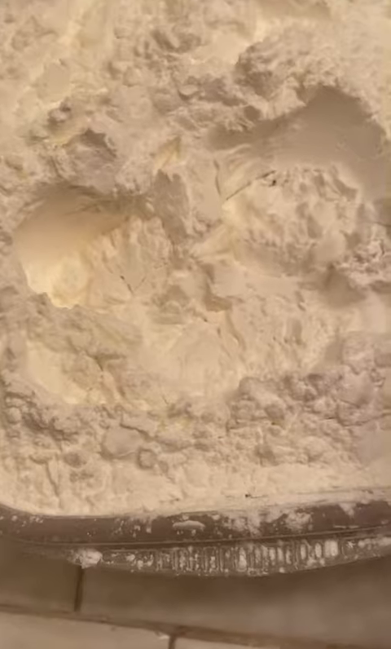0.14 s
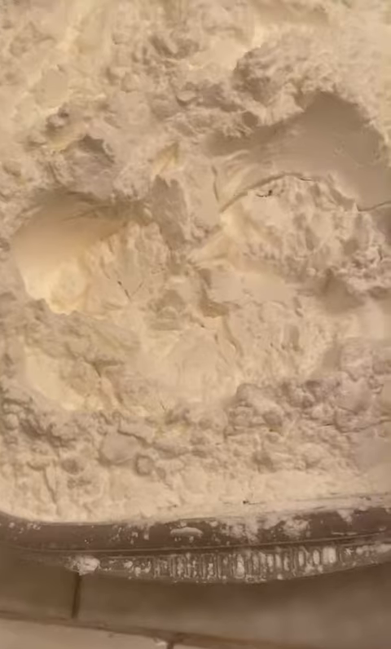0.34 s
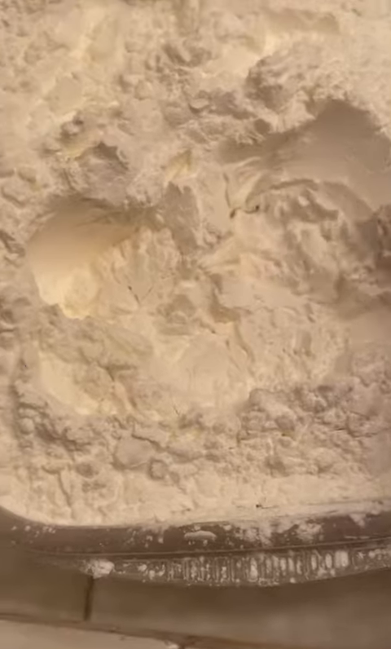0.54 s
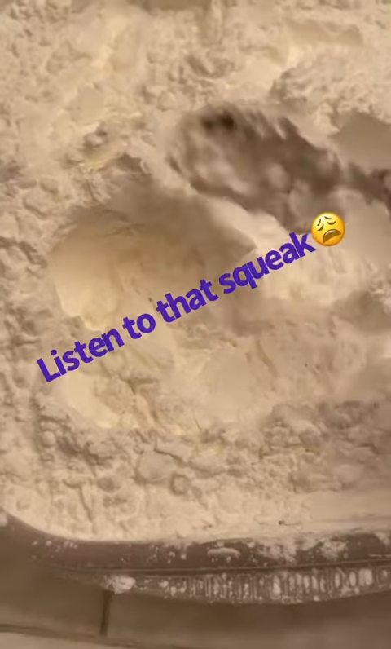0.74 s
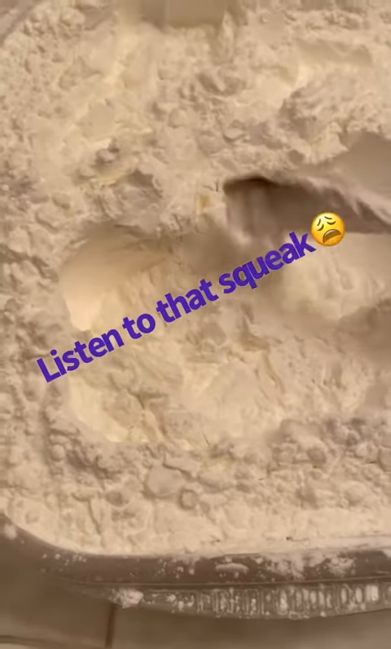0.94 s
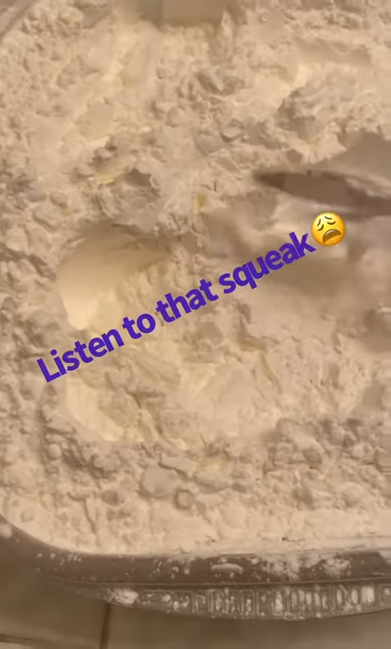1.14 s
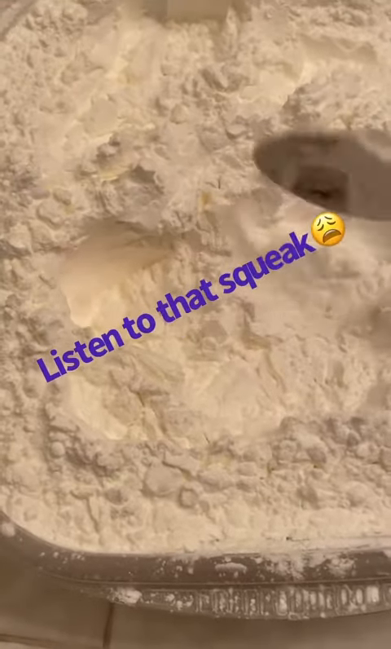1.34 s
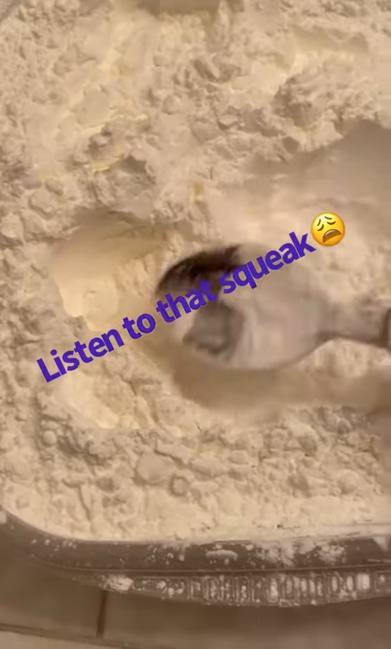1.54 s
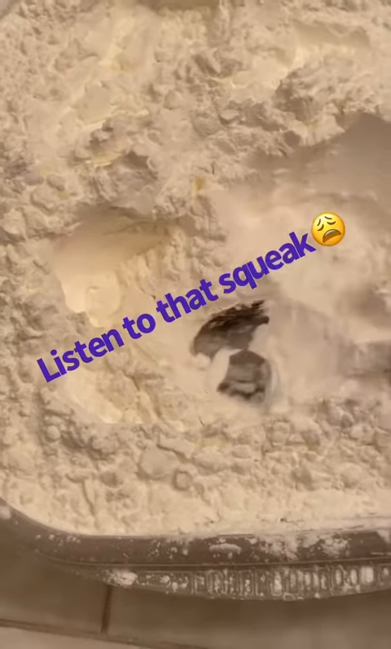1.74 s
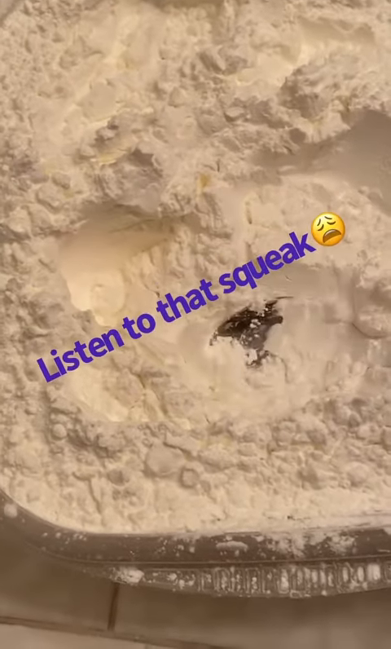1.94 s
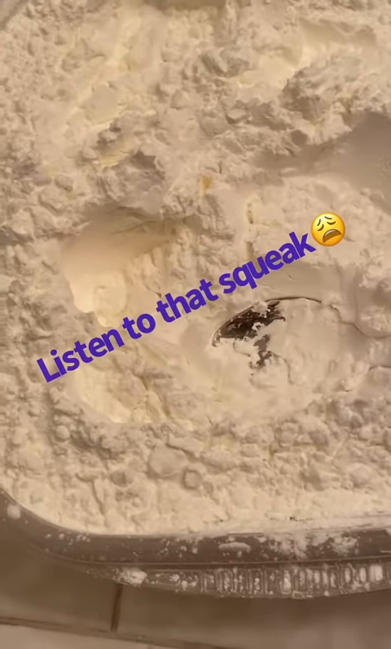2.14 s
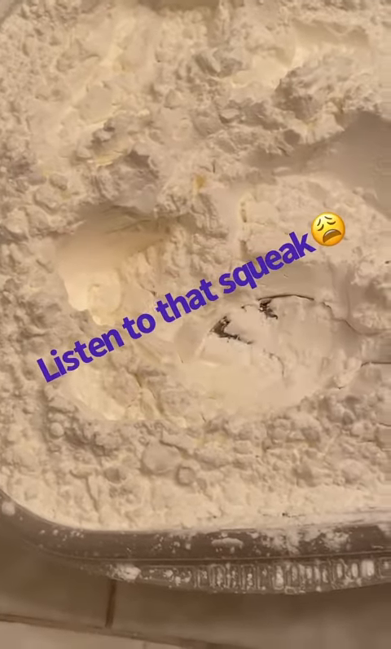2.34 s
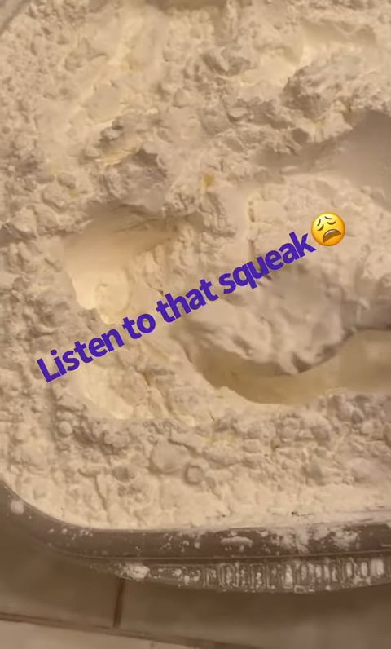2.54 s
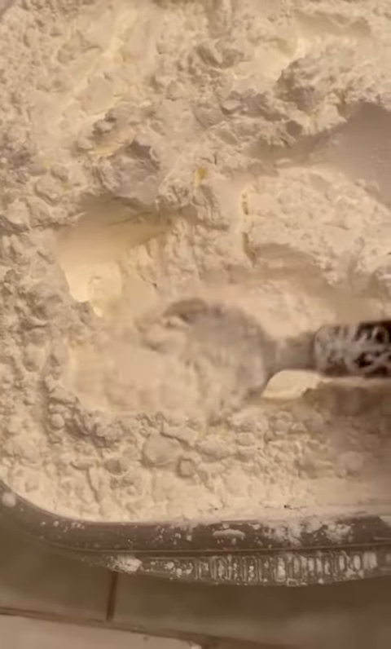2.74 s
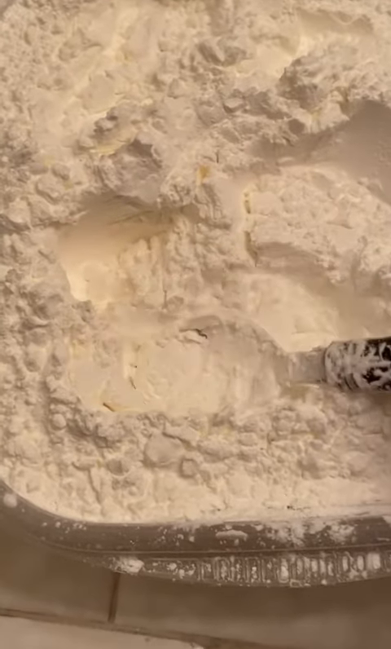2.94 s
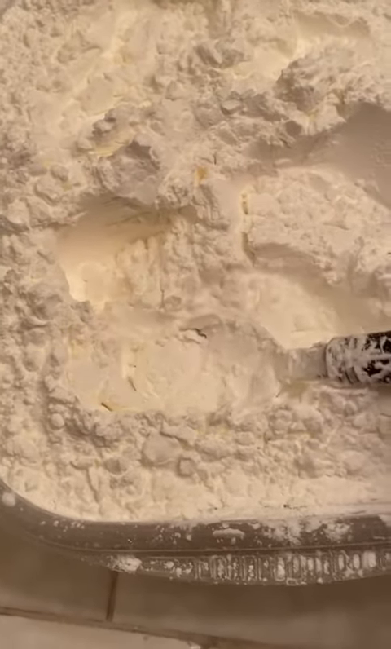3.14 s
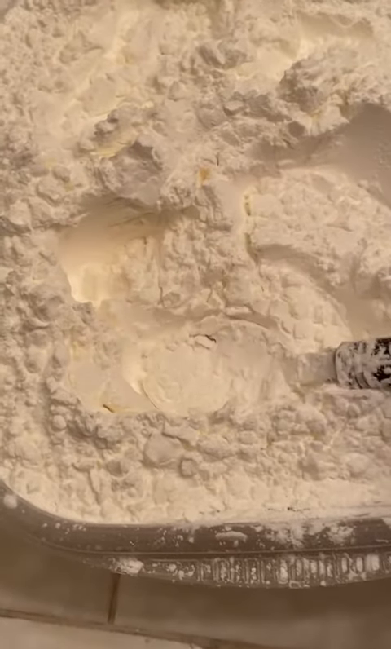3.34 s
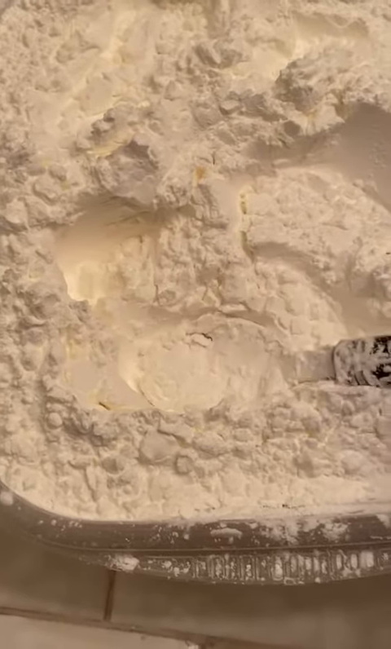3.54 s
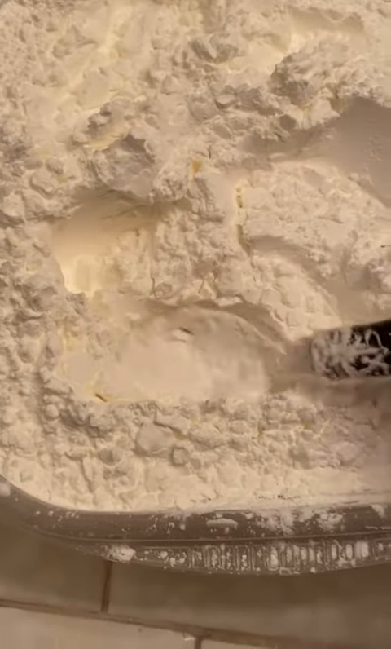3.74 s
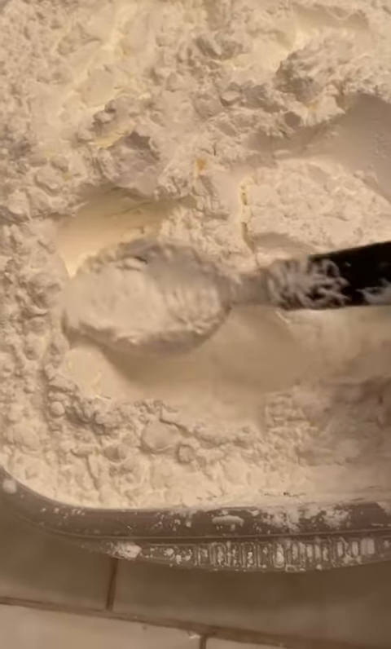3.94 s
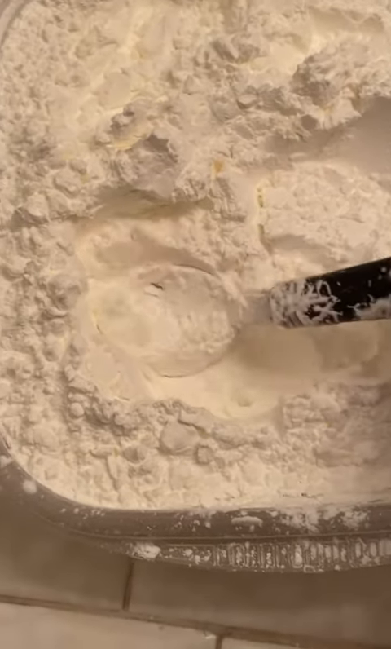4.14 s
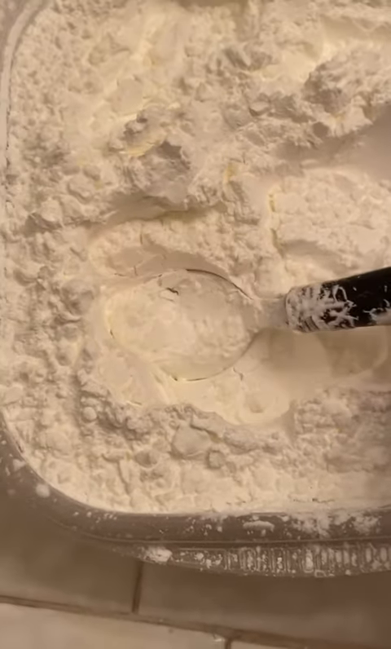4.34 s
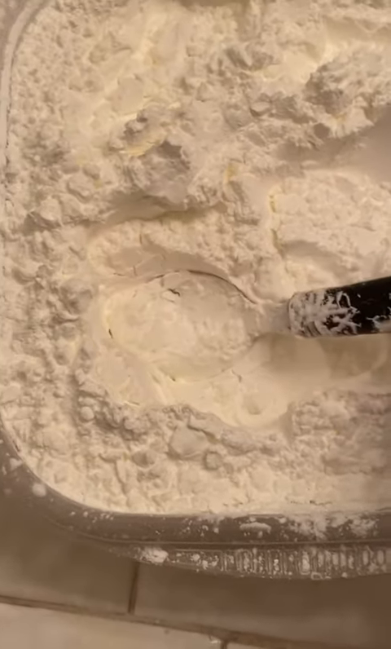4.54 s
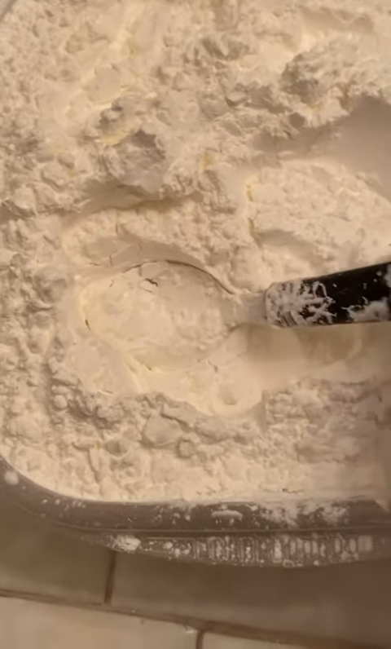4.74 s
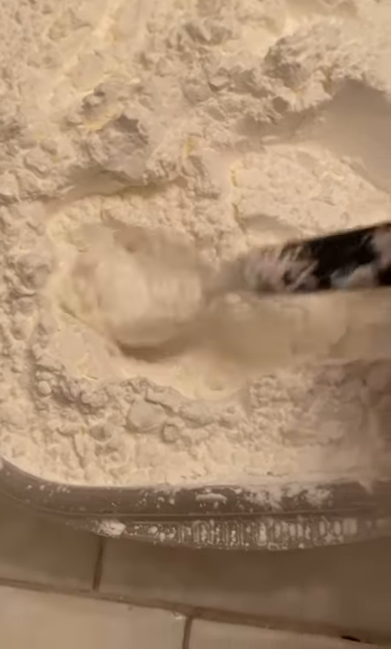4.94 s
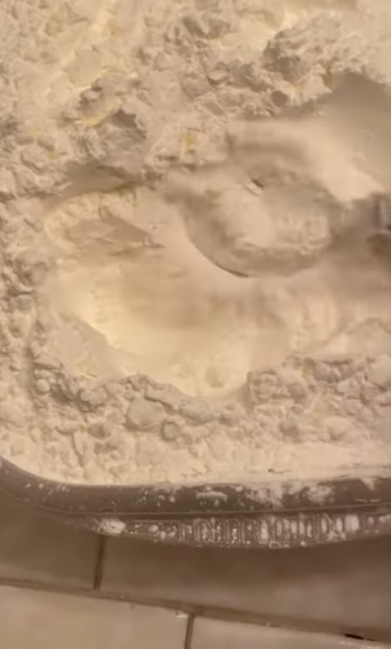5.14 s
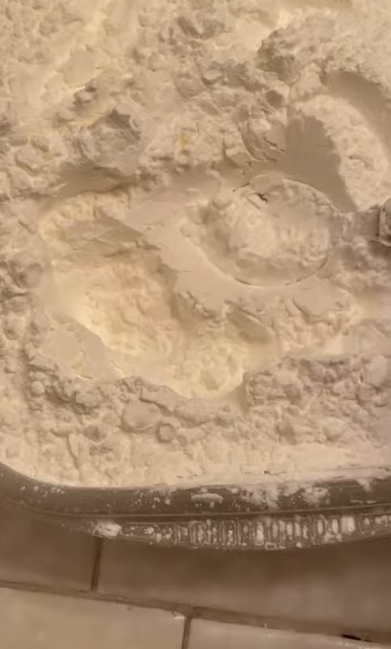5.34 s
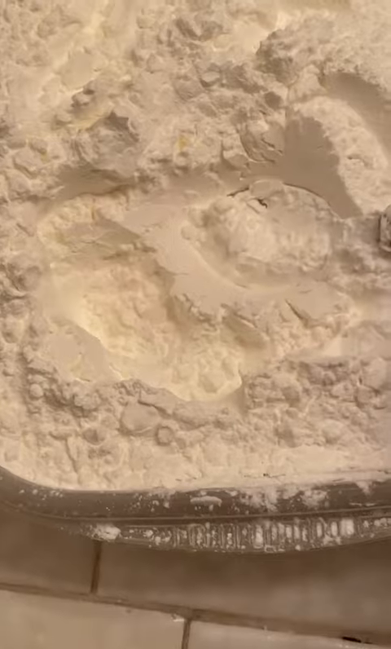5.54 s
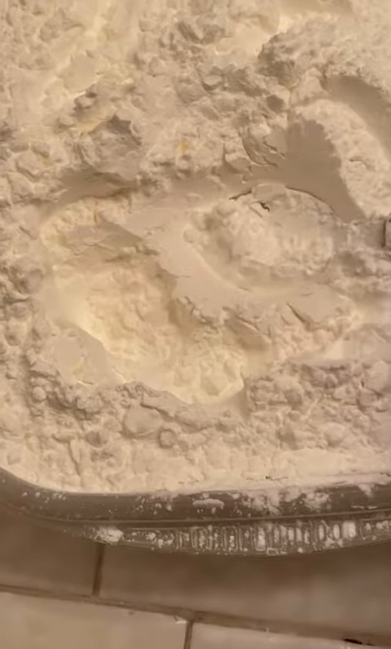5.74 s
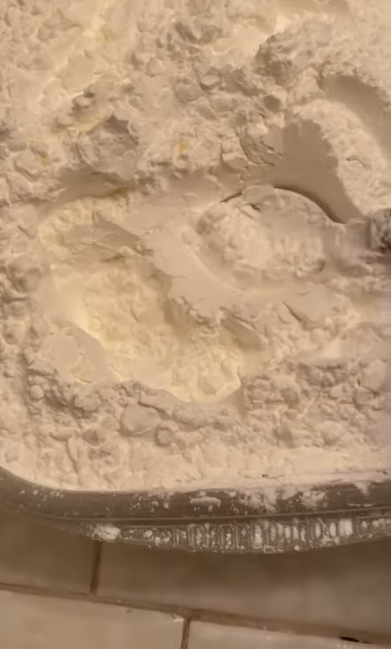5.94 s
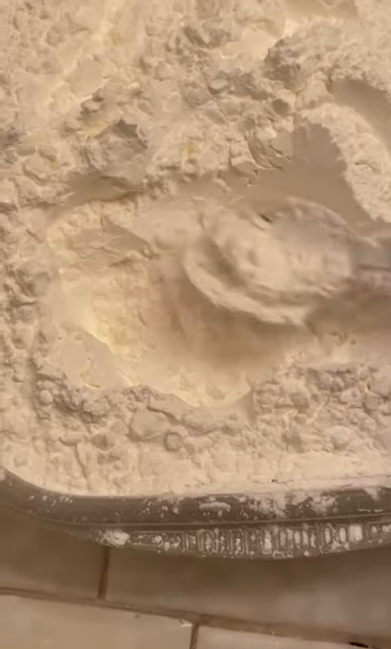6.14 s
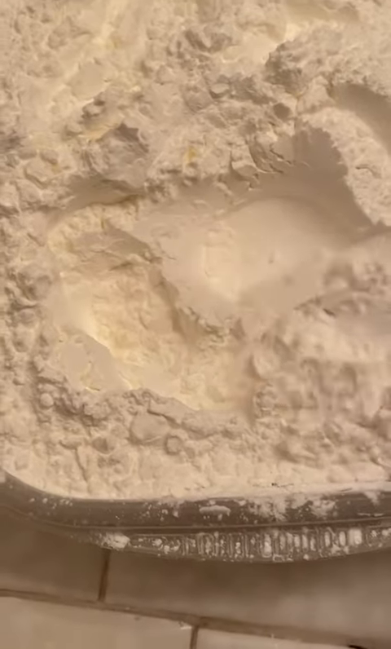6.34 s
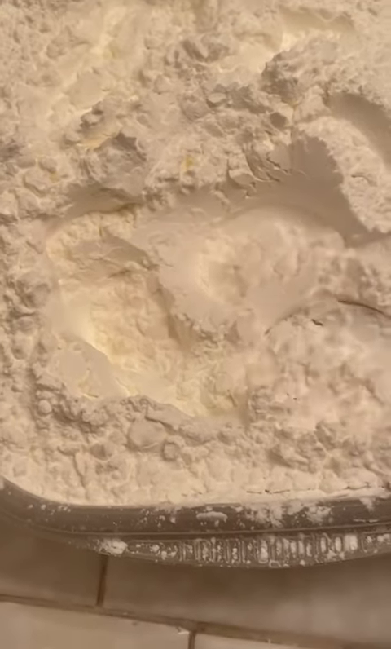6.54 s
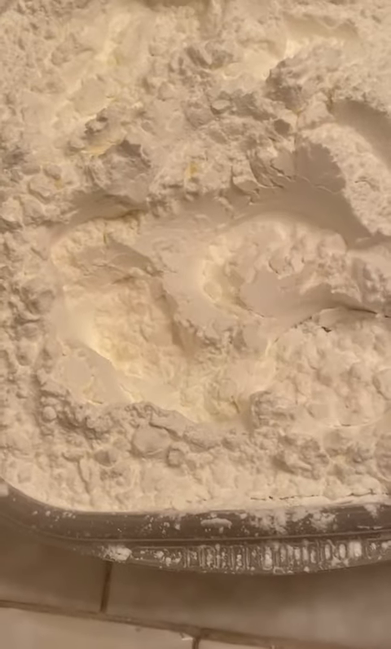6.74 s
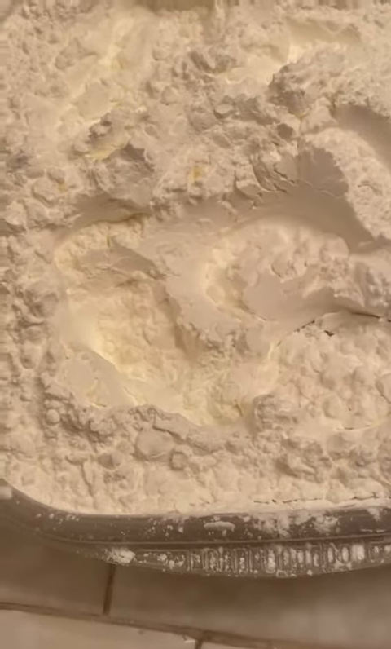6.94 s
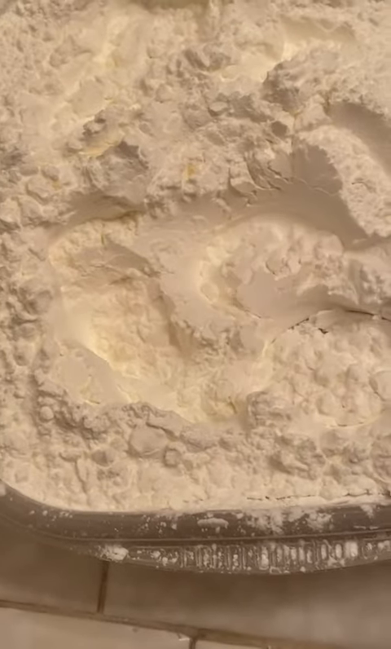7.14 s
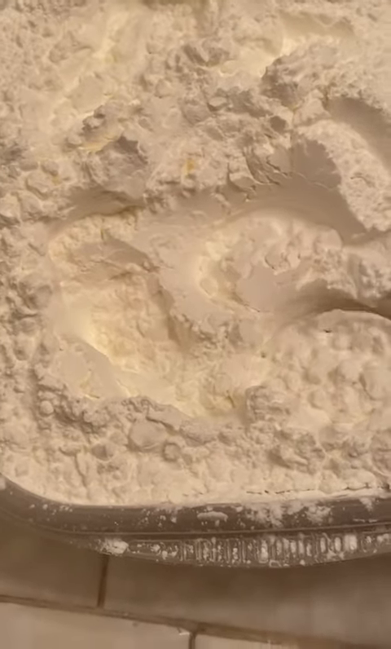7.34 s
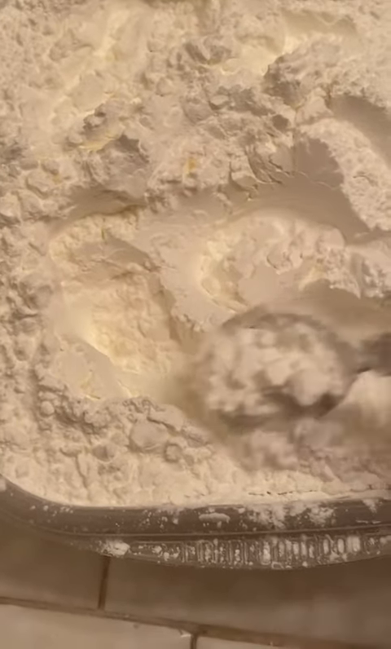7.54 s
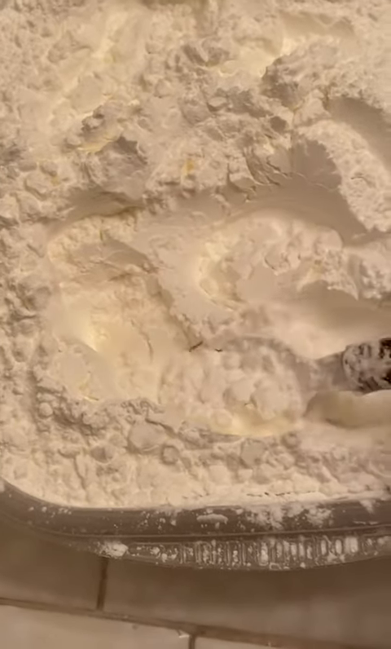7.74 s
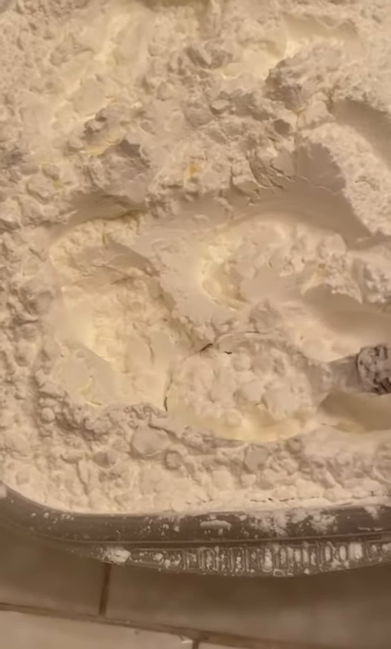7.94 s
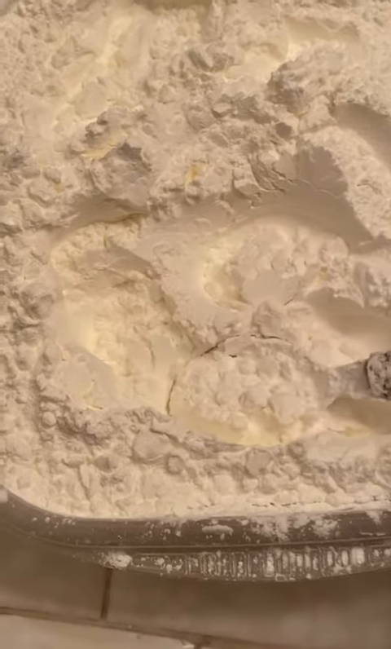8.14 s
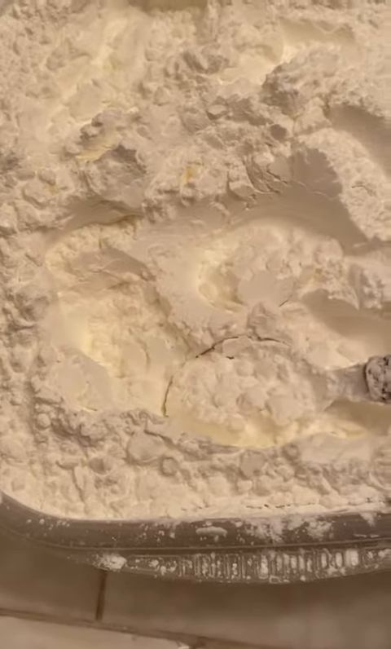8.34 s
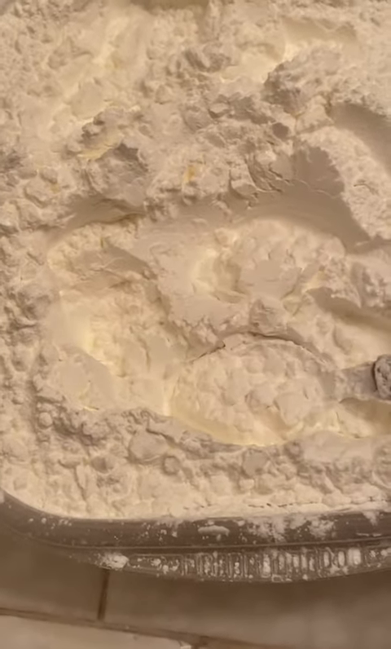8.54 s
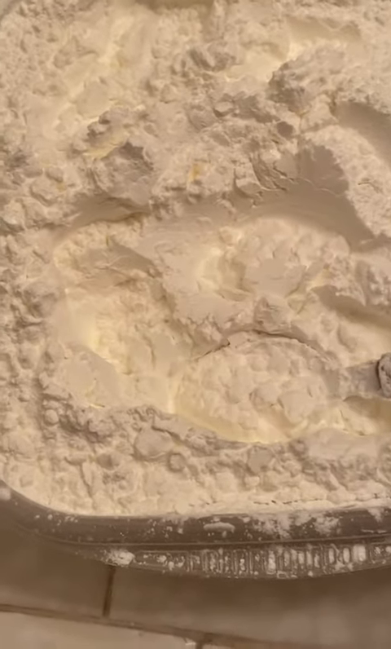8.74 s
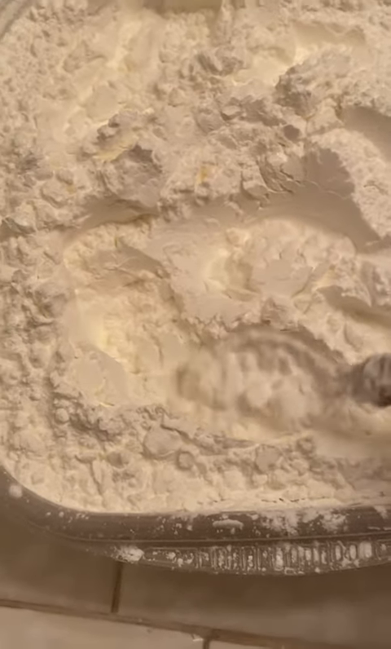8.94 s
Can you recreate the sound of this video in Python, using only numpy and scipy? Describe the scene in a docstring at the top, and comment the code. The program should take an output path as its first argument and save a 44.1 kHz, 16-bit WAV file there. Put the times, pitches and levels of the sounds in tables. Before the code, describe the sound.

Dry, tightly packed powder creaks and crunches under repeated spoon pushes, chirping in places, over a faint indoor rumble and hiss.

```python
"""A quiet kitchen rumbles and hisses; a faint steady tone, a sine and its octave, fades after about five seconds.
From the start a metal spoon is pushed again and again into a plastic tub of packed cornstarch, which yields
by stick and slip: even slips fuse into gliding squeaks, lone ones chirp and crack, crowds crunch over a rub of grains.
Now and then loose powder trickles as high hiss; early on, two knocks ring spoon and tub, crush powder and thump.
Later pushes also flex the tub wall, heard as swells of dull noise; the kitchen answers with reflections and a tail."""
import sys
import numpy as np
from scipy import signal
from scipy.fft import rfft, irfft, next_fast_len
from scipy.io import wavfile
from scipy.ndimage import uniform_filter1d

SR = 44100
rng = np.random.default_rng(int(sys.argv[2]) if len(sys.argv) > 2 else 0)


def master_out(mix):
    """Clip the mix to full scale and print it as 16-bit PCM to the path in sys.argv[1]."""
    frames = np.transpose(np.atleast_2d(mix))
    ceiling = np.clip(frames, -1, 1)
    pcm = np.round(ceiling * 32767).astype(np.int16)
    wavfile.write(sys.argv[1], SR, pcm)


N = 400428
TIME = np.arange(N) / SR   # [s]

# lone slips that stand out of the crunching:
# (time of letting go [s], chirp level [dB], crack level [dB], pitch [Hz])
SLIPS = [(0.0398, -35.5, -61, 1280), (0.0508, -31.5, -54.5, 870), (0.0728, -30, -47, 900),
         (0.135, -28.5, -49, 1160), (0.165, -28.5, -46, 1350), (0.2262, -37.5, -67, 1030),
         (0.248, -29, -50.5, 800), (0.266, -36, -47, 1830), (0.2988, -23, -45.5, 1090),
         (0.32, -36, -53, 1290), (0.3319, -27, -43.5, 1840.0), (0.378, -26.5, -42, 1330),
         (0.3938, -32, -46, 900), (0.3983, -27, -43, 1450), (0.4046, -23, -39.5, 1210),
         (1.9584, -41.5, -82, 646), (1.9901, -43, -76, 594), (2.041, -40.5, -66, 540.0),
         (2.1065, -37.5, -54.5, 664), (2.2696, -30.5, -53, 900), (2.2784, -39, -53, 617),
         (2.2946, -31.5, -57, 820), (2.3019, -34, -50.5, 1090), (2.3117, -24.5, -44.5, 1100.0),
         (3.145, -37.5, -57.5, 524), (3.2498, -36.5, -64, 1010), (3.2658, -35.5, -59, 940),
         (3.2959, -36.5, -55, 714), (3.318, -31.5, -52, 820), (3.329, -31, -58, 880),
         (3.3367, -32.5, -55, 785), (3.3433, -30, -47, 1000.0), (3.363, -30, -57, 1060),
         (3.3779, -29.5, -52, 910), (3.3825, -33.5, -52, 850), (3.3986, -31.5, -48, 740),
         (3.4043, -34.5, -49.5, 870), (3.4208, -25.5, -46.5, 1110.0), (3.4485, -41, -56, 715),
         (3.4798, -31.5, -54.5, 876), (3.5159, -33.5, -58, 1000), (3.535, -40, -65, 850),
         (3.546, -26, -45, 1060.0), (3.563, -27.5, -44, 1000.0), (3.571, -33, -51, 1270),
         (3.5783, -27.5, -46.5, 870), (3.5855, -31.5, -59, 880), (3.5997, -33.5, -51, 1170),
         (4.219, -37.5, -57.5, 570.0), (4.2654, -32.5, -49.5, 710), (4.3514, -39, -59.5, 780),
         (4.3687, -41, -58, 910), (4.4142, -33.5, -51.5, 750), (4.4387, -34, -55, 860),
         (4.4445, -37, -53, 1060), (4.461, -35, -50, 730), (4.4755, -33, -52, 1200),
         (4.488, -34, -51, 1030), (4.4986, -41, -54, 960), (4.5138, -31.5, -45.5, 1100),
         (4.521, -43, -55, 970), (4.5314, -36.5, -54, 1140), (4.6103, -29, -39.5, 905),
         (4.619, -35, -60, 830), (4.6364, -37.5, -54, 905), (4.646, -34, -48, 830), (4.6631, -37, -47, 980),
         (4.671, -30.5, -43.5, 1120), (4.6797, -28, -43, 1290), (4.715, -35, -50, 1150),
         (4.7316, -25.5, -44.5, 850), (4.7388, -27.5, -49, 980), (4.7441, -26.5, -42, 940),
         (5.394, -29.5, -58, 636), (5.4197, -43.5, -58, 880), (5.473, -37, -62, 880),
         (5.4928, -30.5, -57.5, 765), (5.5338, -31, -52, 810), (5.5454, -36.5, -54.5, 590),
         (5.5926, -25, -55, 907), (5.6002, -36, -49, 920), (5.622, -28.5, -55, 770),
         (5.6294, -31, -50, 780), (5.6397, -40, -64, 650), (5.652, -27.5, -47, 860),
         (5.669, -32.5, -47.5, 980), (5.6772, -39, -47, 720), (5.6848, -26, -62, 800),
         (5.692, -32, -46, 820), (5.705, -32.5, -52, 880), (5.7121, -31.5, -55, 900),
         (5.718, -25, -51, 1270), (5.731, -34.5, -58, 1010), (5.7352, -33.5, -52, 890),
         (5.7427, -32.5, -58.5, 670), (5.7548, -30.5, -49, 870), (5.8037, -27.5, -51, 1450),
         (5.8143, -28.5, -46, 1500), (5.8205, -29, -58, 1090), (5.8263, -38, -49.5, 950),
         (5.8302, -30.5, -60, 840), (5.836, -33, -55, 700), (5.8402, -31.5, -45, 1160),
         (6.4891, -42.5, -82, 470.0), (6.5258, -39.5, -65, 613), (6.5411, -32.5, -53, 710),
         (6.635, -42.5, -73, 506), (6.721, -41, -57, 590), (6.7508, -33, -61, 1090.0),
         (6.7588, -33, -53, 740), (6.7786, -31.5, -59, 846), (6.836, -33.5, -54, 700.0),
         (6.872, -30.5, -50.5, 920), (6.8811, -39.5, -58, 880), (6.8914, -36.5, -58, 750),
         (7.1026, -46.5, -64, 850), (7.1253, -32.5, -50, 1510.0), (7.138, -27.5, -45.5, 860),
         (7.155, -28.5, -53, 820), (7.1637, -34, -47, 580.0), (7.8353, -34.5, -65, 697),
         (7.8807, -39.5, -71, 720), (7.892, -35.5, -71, 570), (7.923, -39, -60, 1000),
         (7.9638, -34, -60, 950), (7.9848, -37, -69, 705), (8.0036, -32.5, -58, 644),
         (8.0362, -30, -55, 700), (8.0681, -33, -57, 700), (8.0751, -35.5, -56, 1230),
         (8.0828, -35, -54, 740), (8.1007, -32, -53, 900), (8.1079, -35, -61, 990), (8.1245, -33, -61, 870),
         (8.133, -36.5, -51, 600), (8.143, -31.5, -55, 740), (8.1627, -30.5, -52.5, 630),
         (8.1702, -37, -57, 550), (8.2153, -31.5, -49, 880), (8.2558, -33, -50.5, 920),
         (8.301, -33.5, -47.5, 930), (8.329, -26, -42.5, 770), (8.3444, -34, -55, 910),
         (8.3716, -43, -57, 670), (8.4031, -38.5, -63.5, 830), (8.4244, -36, -60, 800),
         (8.708, -44, -65, 1300), (8.726, -33, -58.5, 1250)]
# pushes of the spoon, each a run of small slips:
# (start [s], end [s], level [dB], swell from start to end [dB], pitch [Hz])
PUSHES = [(0.059, 0.087, -46.5, -6, 930), (0.174, 0.183, -41.5, -4, 1180), (0.269, 0.283, -39, -10, 1180),
          (0.401, 0.427, -38, 5, 1080), (.43, 0.461, -44.5, 10, 1110), (1.827, 1.87, -59.5, 7, 546),
          (1.925, 2.059, -60, 2, 739), (2.086, 2.125, -48.5, -2, 826), (2.31, 2.357, -43, -5, 1180),
          (2.874, 2.923, -62.5, 1, 640), (3.034, 3.185, -56, 15, 684), (3.241, 3.294, -52, -10, 720),
          (3.343, 3.438, -43.5, 1, 952), (3.585, 3.613, -40, 0, 1120), (4.053, 4.145, -62, 6, 620),
          (4.211, 4.24, -44, 5, 670), (4.264, 4.294, -47, 6, 750), (4.421, 4.525, -46.5, -2, 957),
          (4.613, 4.685, -45.5, 27, 1053), (4.737, 4.751, -37, -8, 810), (4.755, 4.81, -42, -15, 1160),
          (5.245, 5.339, -51, 4, 543), (5.38, 5.464, -48.5, -3, 715), (5.627, 5.751, -48, 6, 891),
          (5.823, 5.854, -41.5, -4, 960), (6.381, 6.5, -53.5, 12, 676), (6.545, 6.578, -49, 10, 965),
          (6.784, 6.808, -36, 7, 1210), (6.809, 6.904, -50, 20, 840), (7.144, 7.174, -39.5, 5, 660),
          (7.176, 7.199, -38.5, 0, 1530), (7.672, 7.715, -57.5, 8, 670), (7.737, 7.771, -52, 8, 760),
          (7.809, 7.876, -53.5, -4, 850), (7.881, 7.956, -45.5, -3, 725), (8.081, 8.199, -50, -5, 844),
          (8.326, 8.41, -51, -25, 686), (8.726, 8.763, -44, -0.5, 1420)]
# how strongly the tub radiates a slip: (frequency [Hz], gain [dB])
RADIATION = [(60, -33.5), (140, 6.5), (285, -5), (345, 4.5), (430, 1.5), (540, 3.5), (720, -2), (950, 1),
             (1300, -4.5), (1700, -6.5), (2050, -3.5), (2450, -10.5), (2900, -33.5), (3600, -23.5),
             (6000, -59.5)]
# spectrum of parting grains: (frequency [Hz], gain [dB])
CRACK = [(1200, -11), (2400, -1.5), (3300, 1.5), (4200, 2), (5300, -1), (6300, -9.5), (7000, -32.5),
         (7800, -23.5), (8800, -10.5), (11000, -13.5), (12500, -21), (15000, -28)]

GRAIN_SIZE, GRAIN_LEAD = 512, 160   # samples in one slip, and samples ahead of its peak
SLIP_RISE_S = .002   # from letting go to the peak
USUAL_PUSH_DB = -41   # push level to which the slip rate, cracks and rubbing are referred


def from_db(db):
    """Decibels to amplitude ratio: 20 dB per factor of ten."""
    return 10 ** (np.asarray(db) / 20)


def rms_one(x):
    """Normalisation to unit mean power."""
    return x / np.sqrt(np.mean(x ** 2) + 1e-20)


def at_hz(points, hz):
    """Linear interpolation of a table on a log-frequency axis."""
    known, values = np.transpose(points)
    return np.interp(np.log(np.maximum(hz, 1)), np.log(known), values)


def coloured(x, spectrum):
    """Linear filtering: each frequency component is weighted by a table of gains."""
    size = next_fast_len(x.shape[-1])
    gain = from_db(at_hz(spectrum, np.fft.rfftfreq(size, 1 / SR)))
    return irfft(rfft(x, size) * gain, size)[..., :x.shape[-1]]


def add(track, sound, s):
    """Superposition: mix a sound into a track from a given time on."""
    at = max(round(s * SR), 0)
    room = track[..., at:at + sound.shape[-1]]
    room += sound[..., :room.shape[-1]]


def ring(force, hz, t60):
    """Damped resonance: a unit click sets an exponentially decaying sine of height 1 ringing."""
    r, w = from_db(-60 / (t60 * SR)), 2 * np.pi * hz / SR
    return signal.lfilter([0, np.sin(w)], [1, -2 * r * np.cos(w), r * r], force + 1e-18)


def swells(rows):
    """Gaussian envelopes: a level rises and falls smoothly around each (centre s, length s, dB)."""
    return sum(from_db(db) * np.exp(-(2 * (TIME - s) / length) ** 2) for s, length, db in rows)


def ambience(ambience_db=-63, tone_hz=538.3, tone_overtone_db=-25):
    """Partial coherence: noise most alike at both ports in the lows, plus a faint harmonic tone."""
    # spectrum of rumble and hiss: (frequency [Hz], relative density [dB per Hz])
    noise_spectrum = [(18, -37.5), (30, -20), (48, -9), (70, 0.5), (95, -9), (130, -3.5), (200, -19),
                      (300, -24.5), (355, -15.5), (405, -26), (470, -16.5), (600, -29), (800, -32.5),
                      (930, -28.5), (1100, -35.5), (1400, -40.5), (5400, -49.5), (7400, -63), (9500, -50),
                      (12500, -54), (14500, -60)]
    # left-right likeness of the noise: (frequency [Hz], coherence [0 to 1])
    likeness = [(100, 0.99), (250, 0.37), (600, 0.11), (2000, 0.16), (9000, 0.086)]
    # gain of the low rumble: (time [s], gain [dB])
    rumble_gain = [(0, 9), (.6, 2.5), (.75, -7.5), (.98, -6.5), (1.45, 1), (2.9, 1), (3.6, 0.5),
                   (3.73, -5.5), (4.1, 1.5), (4.9, 3), (5.2, -1.5), (6.05, -3), (6.15, -7.5), (6.4, 0),
                   (6.9, -3.5), (7.25, 2.5), (7.45, -3.5), (7.6, -1.5), (8.5, -5), (9.08, 3.5)]
    # faint steady tone: (time [s], rms level of the fundamental [dB])
    tone_level = [(0, -75), (.7, -75), (1.3, -72), (1.8, -68.5), (2.6, -68.5), (3.8, -73), (5.1, -73),
                  (6.0, -94), (9.08, -100)]
    mid, side = coloured(rng.standard_normal((2, N)), noise_spectrum)
    # the share of opposed signal sets the coherence
    apart = [(hz, 10 * np.log10(np.clip((1 - c) / (1 + c), .001, 1))) for hz, c in likeness]
    noise = rms_one(mid + coloured(side, apart) * [[1], [-1]])
    rumble = coloured(noise, [(500, 0), (2000, -30)])
    hiss = noise - rumble
    phase = 2 * np.pi * tone_hz * TIME
    harmonics = np.sin(phase) + from_db(tone_overtone_db) * np.sin(2 * phase)
    tone = from_db(np.interp(TIME, *np.transpose(tone_level))) * np.sqrt(2) * harmonics
    rumble = rumble * from_db(np.interp(TIME, *np.transpose(rumble_gain)))
    return from_db(ambience_db) * (hiss + rumble) + tone


def squeaks(jitter=0.049, flutter=0.28, overtone_db=-7.0, level_db=0.0, grit_db=-16.5, edge=0.19):
    """Periodic stick-slip: locked slips make a gliding, gritty harmonic tone with uneven cycles."""
    # squeaks whose pitch follows an arch:
    # (start [s], length [s], level [dB], slip rate at start, middle and end [slips per s])
    squeak_rows = [(.0235, .013, -40.5, 1180, 1120, 920), (.057, .006, -41, 1050, 1100, 1150),
                   (.0615, .011, -39, 1250, 1600, 1250), (.0745, .009, -39.5, 1350, 1900, 1650),
                   (.084, .009, -44, 1000, 800, 650), (.1065, .009, -41, 1750, 1600, 1300),
                   (.1205, .006, -42, 1150, 1300, 1250), (.269, .009, -40, 2100, 1700, 1400),
                   (.419, .014, -36.5, 900, 900, 1000), (.436, .011, -41, 1000, 850, 650),
                   (2.3185, .012, -36, 1150, 1120, 1050), (2.331, .008, -39.5, 1200, 1080, 850),
                   (4.467, .009, -44.5, 1700, 1900, 1750), (5.843, .015, -40, 1150, 1400, 1750),
                   (5.857, .017, -41, 1900, 2170, 1780), (5.8785, .014, -38, 880, 950, 850),
                   (6.786, .02, -42, 1250, 1150, 1000), (7.194, .011, -43, 950, 1120, 1250)]
    out = np.zeros((2, N))   # rows are tone and grit
    for start, length, db, *rates in squeak_rows:
        progress = np.linspace(0, 1, max(int(length * SR), 64))
        waver, grip, grit = rng.standard_normal((3, SR // 4))[:, :len(progress)]
        # a parabola in log frequency through the three rates
        arch = np.exp(np.polyval(np.polyfit([0, .5, 1], np.log(rates), 2), progress))
        hz = arch * (1 + jitter * rms_one(uniform_filter1d(waver, size=40)))
        phase = 2 * np.pi * np.cumsum(hz) / SR
        tone = 0
        for k in range(1, 5):
            gain_db = overtone_db * np.log2(k) + at_hz(RADIATION, k * hz)
            tone = tone + from_db(gain_db) * np.sin(k * phase)
        smooth_grip = uniform_filter1d(uniform_filter1d(grip, size=40), size=24)
        tone = tone * np.exp(flutter * rms_one(smooth_grip))
        # edge is the share of a squeak spent in attack and release
        level = from_db(db + level_db) * signal.windows.tukey(len(progress), edge)
        pulsed_grit = from_db(grit_db) * grit * (1 + np.cos(phase))
        add(out, level * np.array([rms_one(tone), pulsed_grit]), start)
    return out


def tub(force):
    """Modal superposition: the filled tub answers a force as a sum of damped modes."""
    # modes of the filled tub: (frequency [Hz], gain [dB], t60 [s])
    tub_modes = [(53.16, -13.5, 0.42), (75.8, -10.5, .55), (114, -12.5, 0.22), (138, -8, 0.22),
                 (184.7, -13, 0.2), (240, -17.5, 0.19), (347, -20, 0.08), (361, -13, 0.3),
                 (428, -13.5, .12), (470, -20, 0.1), (529.8, -25.5, 0.35), (635.5, -20.5, 0.33),
                 (690, -31.5, 0.073), (739, -18, 0.35), (840, -29, 0.18), (914, -28.5, 0.35),
                 (1015, -27, 0.16), (1190, -22.5, .14), (1570, -19.5, 0.2), (1820, -35, 0.03),
                 (2073, -8.5, .05), (2262, -16.5, 0.045), (3140, -16.5, 0.12)]
    return sum((-1) ** k * from_db(db) * ring(force, hz, t60) for k, (hz, db, t60) in enumerate(tub_modes))


def chirps(pitch_hz, octaves_below=0.92, octaves_above=1.07, travel_s=0.00245, travel_spread_db=2.0,
           stutter_spread=0.21, stutter_depth=0.39, travel_hz=803, travel_slope=0.6):
    """Dispersion: bending waves carry highs faster than lows, so each slip's pulse of height 1 falls in pitch."""
    hz = np.fft.rfftfreq(GRAIN_SIZE, 1 / SR) + 1
    centre = np.asarray(pitch_hz)[:, None]
    chance = rng.standard_normal((len(centre), 4))
    # the powder catches again for a cycle before and after the main slip, which gives it a note
    note = centre * np.exp(stutter_spread * chance[:, :1])
    depth = np.clip(stutter_depth + .25 * chance[:, 1:2], 0, 1)
    stutter = 1 + depth * np.cos(2 * np.pi * hz / note)
    octaves = np.where(hz < centre, octaves_below, octaves_above)
    bell = np.exp(-.5 * (np.log2(hz / centre) / octaves) ** 2)
    size = bell * from_db(at_hz(RADIATION, hz)) * stutter
    # low-pitched slips start deeper and travel longer; travel is the time taken by a 1 kHz wave
    travel = travel_s * (travel_hz / centre) ** travel_slope * from_db(travel_spread_db * chance[:, 2:3])
    # delay falls as 1 / sqrt(frequency), set so that the centre arrives at GRAIN_LEAD
    cycles = 2 * travel * np.sqrt(1000 * hz) - hz * travel * np.sqrt(1000 / centre) + hz * GRAIN_LEAD / SR
    pulses = irfft(size * np.exp(1j * (chance[:, 3:] - 2 * np.pi * cycles)))
    return pulses / np.abs(pulses).max(axis=1, keepdims=True)


def cracks(count, decay_s=0.0015, ahead_s=0.00069, rise_s=.0006):
    """Impulsive fracture: grains part in a spit of noise just ahead of each chirp."""
    age = (np.arange(GRAIN_SIZE) - GRAIN_LEAD) / SR + ahead_s
    return rng.standard_normal((count, GRAIN_SIZE)) * np.exp(-np.maximum(age / decay_s, -age / rise_s))


def single_slips(body_db=1.5, crack_db=9.0):
    """Stress release: each large slip sounds once at its own pitch; rows are chirps and cracks."""
    out = np.zeros((2, N))
    times, peaks, sharp, pitches = np.transpose(SLIPS)
    pulses = zip(times, peaks, sharp, chirps(pitches), cracks(len(times)))
    for s, db, sharp_db, chirp, crack in pulses:
        slip = np.array([from_db(db + body_db) * chirp, from_db(sharp_db + crack_db) * crack])
        add(out, slip, s + SLIP_RISE_S - GRAIN_LEAD / SR)
    return out


def crunches(uneven=.4, spread_db=1.5, body_db=-3.5, pitch_spread=0.23):
    """Irregular stick-slip: stress lets go at uneven intervals; a longer stick ends in a larger slip."""
    # slip rate of the usual push; a lighter push slips less often
    slips_per_s, push_db_per_doubling = 145, 29.5
    # doublings of the slip rate for each octave that a push is higher
    usual_pitch_hz, hurry = 854.6, 1.5
    # cracks gain crack_growth dB for each dB of the push; soft, low-pitched powder cracks less
    usual_crack_db, crack_growth, crack_hz, crack_db_per_octave = -57, 1.09, 1057, 11
    out = np.zeros((2, N))   # rows are chirps and cracks
    for start, end, db, swell_db, pitch in PUSHES:
        length = abs(end - start)
        effort = 2 ** ((db - USUAL_PUSH_DB) / push_db_per_doubling)
        rate = slips_per_s * effort * (pitch / usual_pitch_hz) ** hurry
        chance = np.clip(rng.standard_normal((128, 3)), -1.7, 1.7)[:max(int(length * rate), 3)]
        stick = np.exp(uneven * chance[:, 0])
        progress = (np.cumsum(stick) - stick[0]) / stick.sum()
        times = progress * length
        sizes = np.sqrt(stick) * from_db(swell_db * progress + spread_db * chance[:, 1])
        # a large slip has already released the stress around it
        nearest = np.abs(start + times[:, None] - np.transpose(SLIPS)[0] - SLIP_RISE_S).min(axis=1)
        sizes = sizes * np.clip(nearest / .004, .3, 1)
        crowd = np.zeros((2, int(length * SR) + GRAIN_SIZE))
        pitches = pitch * np.exp(pitch_spread * chance[:, 2])
        for s, size, chirp, crack in zip(times, sizes, chirps(pitches), cracks(len(times))):
            add(crowd, np.array([size * chirp, size ** crack_growth * crack]), s)
        power = np.sum(crowd ** 2, axis=1, keepdims=True) / (length * SR + 1)
        crack_db = usual_crack_db + crack_growth * (db - USUAL_PUSH_DB)
        crack_db = crack_db + crack_db_per_octave * np.log2(pitch / crack_hz)
        levels = from_db([[db + body_db], [crack_db]])
        add(out, crowd / np.sqrt(power) * levels, start - GRAIN_LEAD / SR)
    return out


def rubbing(grains_per_s=2500, spread_db=0.5, edge=0.25):
    """Granular creep: between slips a dense random run of tiny grain impulses follows the push."""
    # fine grains shearing under the bowl of the spoon: (frequency [Hz], gain [dB])
    rub_spectrum = [(200, -11), (400, 13), (1000, 10), (2200, 1.5), (3000, -10.5), (5200, -11),
                    (6300, -25.5), (7200, -53), (9000, -26.5), (13000, -44)]
    rub_db, rub_follows = -55.5, 1   # level at the usual push; dB gained for each dB of the push
    level = np.zeros(N)
    for start, end, db, swell_db, _ in PUSHES:
        progress = np.linspace(-.5, .5, max(int((end - start) * SR), 64))
        push_db = db - USUAL_PUSH_DB + swell_db * progress
        window = signal.windows.tukey(len(progress), edge)
        add(level, from_db(rub_db + rub_follows * push_db) * window, start)
    sizes = from_db(spread_db * np.minimum(rng.exponential(1, N), 4)) * rng.choice([-1, 1], N)
    grains = sizes * (rng.random(N) < grains_per_s / SR)
    return level * rms_one(coloured(grains, rub_spectrum))


def trickles(high_pass_hz=9000):
    """Dense small impacts approach noise: sliding powder is a soft swell of fine hiss."""
    # loose powder sliding off the spoon: (centre [s], length [s], peak rms level [dB])
    trickle_rows = [(0.719, 0.063, -75), (0.823, 0.087, -77), (1.475, 0.032, -77), (1.647, 0.18, -80),
                    (8.805, 0.083, -78.5)]
    high_pass = signal.butter(2, high_pass_hz, "high", fs=SR, output="sos")
    hiss = signal.sosfilt(high_pass, coloured(rng.standard_normal((2, N)), CRACK))
    return swells(trickle_rows) * rms_one(hiss)


def knocks(clack_db=0.0, crush_db=-9.5, crush_s=0.0052, sift_db=-11, sift_s=0.04,
           thump_db=-8, thump_hz=1300, settle_hz=52, fall_s=0.004, thump_s=.032, spoon_t60_s=.01):
    """Impact: spoon modes clack, powder is crushed, and dispersed bending waves thump downward in pitch."""
    # the spoon knocks the tub: (time [s], strength [dB])
    knock_rows = [(1.0332, -27), (1.2111, -25)]
    # modes of the spoon, damped by powder and hand: (frequency [Hz], gain [dB])
    spoon_modes = [(700, 7.5), (890, 10.5), (1150, 1.5), (1950, 2), (2600, -9), (3050, -13), (5230, -18)]
    # spectrum of powder crushed by a knock: (frequency [Hz], gain [dB])
    crush_spectrum = [(250, -6), (900, 11), (1500, 6), (2700, -3), (3800, -10.5), (5200, -6.5),
                      (6200, -21.5), (7300, -51), (9000, -30), (13000, -45.5)]
    blow = np.zeros(N)
    for s, db in knock_rows:
        add(blow, from_db([db]), s)
    clack = 0
    for k, (hz, db) in enumerate(spoon_modes):
        clack = clack + (-1) ** k * from_db(db) * ring(blow, hz, spoon_t60_s)
    t = np.arange(SR // 4) / SR
    # a short crush, then the loosened powder sifts down
    yielding = np.exp(-t / crush_s) + from_db(sift_db) * np.exp(-t / sift_s)
    powder = rms_one(coloured(rng.standard_normal(N), crush_spectrum))
    crush = powder * signal.fftconvolve(blow, yielding)[:N]
    hz = settle_hz + thump_hz / (1 + t / fall_s) ** 2
    thump = np.sin(2 * np.pi * np.cumsum(hz) / SR) * (1 - np.exp(-t / 0.0012)) * np.exp(-t / thump_s)
    thump = signal.fftconvolve(blow, thump)[:N]
    return from_db(clack_db) * clack, from_db(crush_db) * crush, from_db(thump_db) * thump, blow


def flexes(level_db=0.0):
    """Slow wall bending radiates lows: the plastic under the hand gives swells of dull noise."""
    # the tub flexes as the hand bears down or lets go: (centre [s], length [s], peak rms level [dB])
    flex_rows = [(2.12, 0.1, -59), (3.19, 0.069, -56.5), (3.42, 0.09, -53.5), (3.58, 0.055, -55.5),
                 (4.25, 0.13, -59.5), (5.72, 0.095, -53), (6.59, 0.079, -53), (6.8, 0.23, -55),
                 (8.15, 0.22, -60), (8.39, 0.17, -53.5)]
    # spectrum of the flexing wall: (frequency [Hz], gain [dB])
    flex_spectrum = [(35, -5), (70, 7), (150, 7.5), (250, 1), (400, -27), (900, -67)]
    rumble = rms_one(coloured(rng.standard_normal(N), flex_spectrum))
    return from_db(level_db) * swells(flex_rows) * rumble


def two_ports(x):
    """All-pass delay: the left port faces away, so some mid bands go round the case and reach it later."""
    # bands that arrive late at the left port: (frequency [Hz], relative width [ratio])
    port_turns = [(820, 0.38), (1400, 0.1)]
    left = x
    for hz, width in port_turns:
        w = 2 * np.pi * hz
        all_pass = signal.bilinear([1, -width * w, w * w], [1, width * w, w * w], SR)
        left = signal.lfilter(*all_pass, left)
    return np.array([left, x])


def kitchen(x, early_db=-6.5, early_s=0.0049, tail_db=-3.5, gap_s=0.0001, spoon_move_s=.12):
    """Reverberation: early reflections off tub and counter change as the spoon moves; a tail decays by band."""
    # reverberation time of the kitchen: (frequency [Hz], t60 [s])
    kitchen_t60 = [(100, 0.66), (400, 0.25), (1400, 0.22), (4000, 0.26), (12000, 0.27)]
    t = np.arange(SR // 2) / SR
    edges = np.geomspace(50, 16000, 10)   # [Hz]
    white, tail = rng.standard_normal((2, 2, len(t))), 0
    for k, (low, high) in enumerate(zip(edges, edges[1:])):
        band_pass = signal.butter(2, [low, high], "band", fs=SR, output="sos")
        band = signal.sosfilt(band_pass, white[k % 2])
        tail = tail + band * from_db(-60 * t / at_hz(kitchen_t60, np.sqrt(low * high)))
    onset = 1 - np.exp(-(t / gap_s) ** 2)
    tail = from_db(tail_db) * rms_one(tail * onset) / np.sqrt(len(t))
    out = signal.fftconvolve(x, tail, axes=-1)[:, :N]
    fade = (onset * np.exp(-t / early_s))[:SR // 10]
    step = int(spoon_move_s * SR)
    # a new reflection pattern at each step, crossfaded with its neighbours
    for at in range(0, N + step, step):
        near = np.arange(max(at - step, 0), min(at + step, N))
        early = rms_one(rng.standard_normal((2, len(fade))) * fade) / np.sqrt(len(fade))
        early = from_db(early_db) * early
        segment = x[:, near] * (1 - np.abs(near - at) / step)
        add(out, signal.fftconvolve(segment, early, axes=-1), near[0] / SR)
    return out


def shadowed(pair):
    """Acoustic shadow: the case shades the left port; the right one lies slightly farther off."""
    # what the left port hears against the right: (frequency [Hz], gain [dB])
    left_port = [(110, -2), (200, -0.5), (350, -4), (550, 0), (950, -10), (1500, -10), (2200, 1.5),
                 (3500, -0.5), (4500, 0.5), (6000, -2)]
    return np.array([coloured(pair[0], left_port), np.roll(pair[1], 1)])


def scene(tub_drive_db=-36.0, thud_db=-12.5, thud_low_hz=70, thud_high_hz=340.2, contact_hz=800,
          clack_room_db=-6, crush_room_db=-3, thump_room_db=-13):
    """Source, resonator and room: slips and knocks sound through the tub into the kitchen."""
    body, crack = single_slips() + crunches() + squeaks()
    crack = coloured(crack, CRACK) + rubbing()
    clack, crush, thump, blow = knocks()
    # each slip lets the spoon sink a little, which pushes on the tub
    thud_band = signal.butter(2, [thud_low_hz, thud_high_hz], "band", fs=SR, output="sos")
    thud = from_db(thud_db) * signal.sosfilt(thud_band, np.abs(body))
    # the powder cushions a blow, so it reaches mainly the low modes
    blow = signal.sosfilt(signal.butter(2, contact_hz, fs=SR, output="sos"), blow)
    ringing = tub(blow + from_db(tub_drive_db) * (body + crack))
    direct = two_ports(body + ringing + thud + thump + clack + crush) + crack
    knock_to_room = from_db(clack_room_db) * clack + from_db(crush_room_db) * crush
    knock_to_room = knock_to_room + from_db(thump_room_db) * thump
    echo = kitchen((body + crack + knock_to_room)[None])
    return shadowed(direct + echo) + flexes() + trickles() + ambience()


def record(dry):
    """Low-pass filtering: everything above 14.5 kHz is at least 60 dB down."""
    return signal.sosfilt(signal.cheby2(12, 60, 14500, fs=SR, output="sos"), dry)


dry = scene()
out = record(dry)
master_out(out)
```